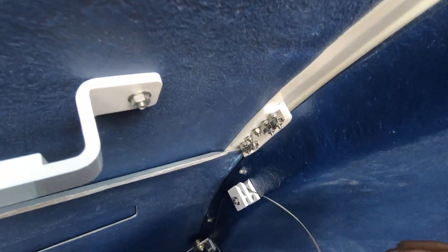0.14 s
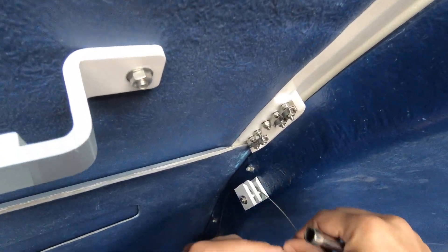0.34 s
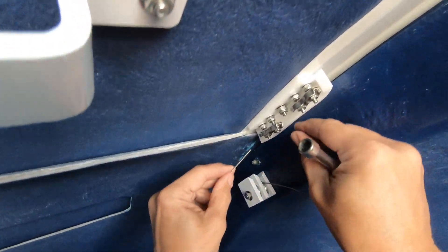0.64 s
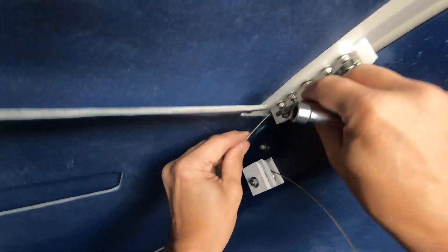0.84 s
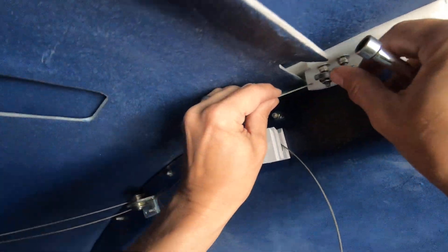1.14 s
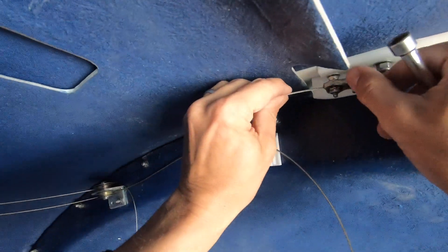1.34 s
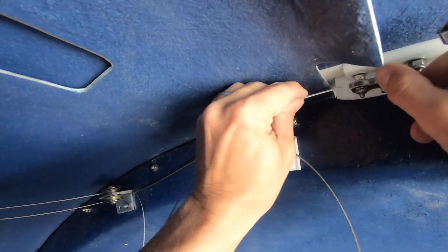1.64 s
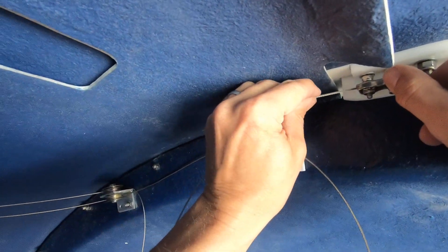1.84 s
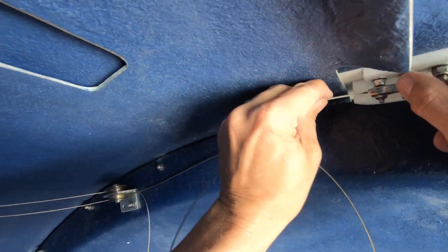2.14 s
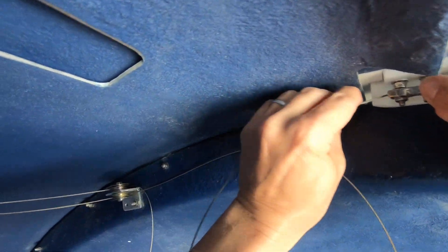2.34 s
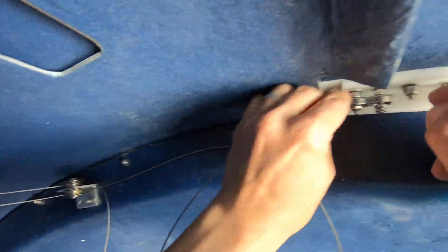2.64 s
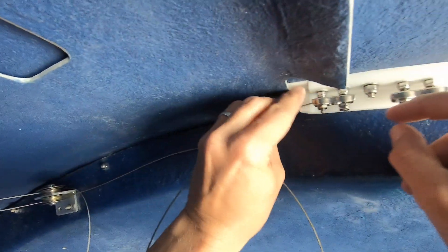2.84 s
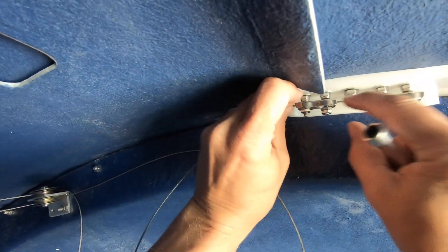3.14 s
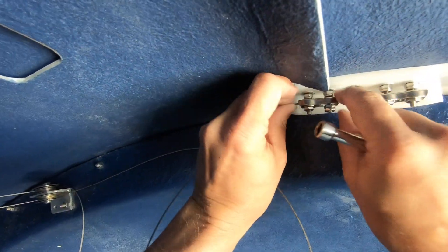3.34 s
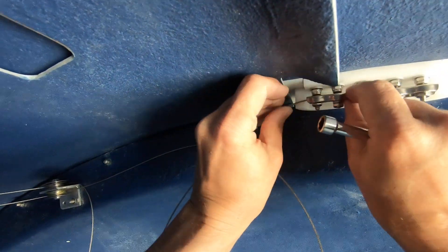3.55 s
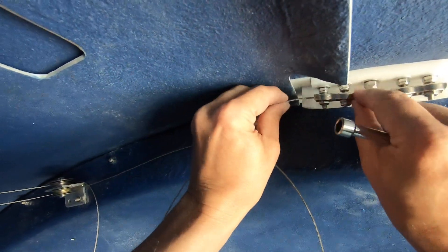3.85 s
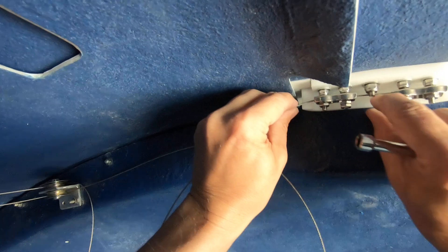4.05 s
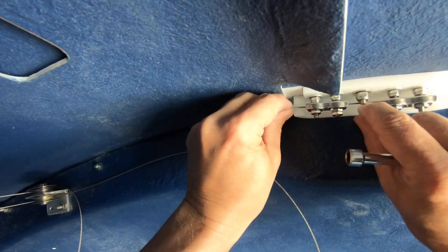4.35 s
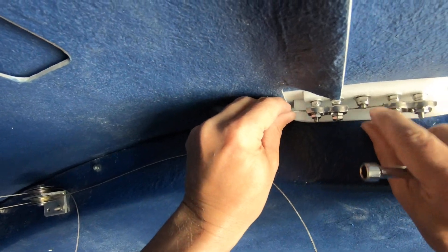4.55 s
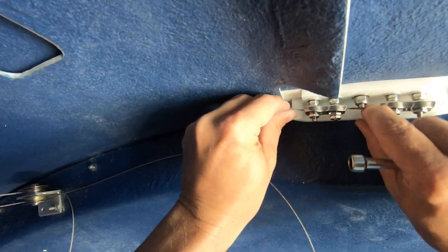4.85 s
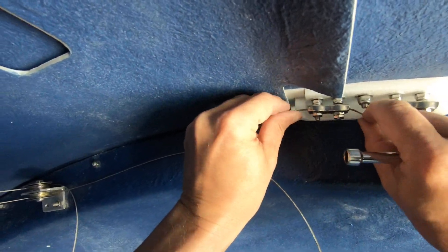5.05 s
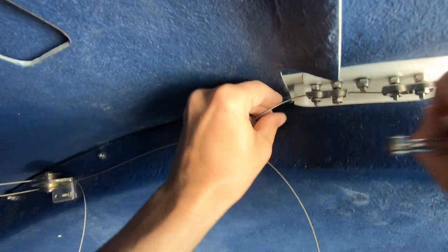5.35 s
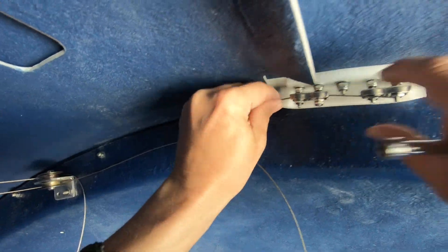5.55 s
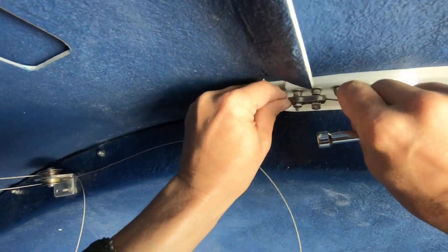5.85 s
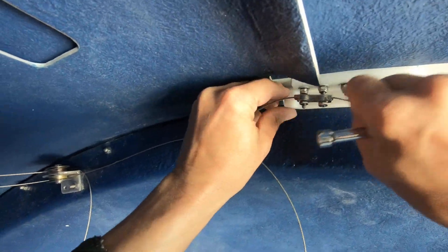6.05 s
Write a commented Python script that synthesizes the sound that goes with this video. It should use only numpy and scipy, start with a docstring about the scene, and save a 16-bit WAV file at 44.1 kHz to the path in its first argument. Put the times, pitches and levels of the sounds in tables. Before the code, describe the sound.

Steel cable clicks, ticks and scrapes irregularly through small metal fittings inside a hollow shell, with dull knocks and low thumps of its wall.

```python
"""Inside a hollow composite shell, two microphone ports hear hands thread a steel cable close by.
The cable ticks, scrapes and squeaks on small pulleys and a clamp: noise bursts, grains and glides through resonances.
A loose steel part tinkles as ringing modes. These metal sounds reverberate in the shell.
Knocks ring the modes of the wall and low thumps swing it, over low rumble, rubbing and still air."""
import sys
import numpy as np
from scipy import signal
from scipy.fft import rfft, irfft, next_fast_len
from scipy.io import wavfile
from scipy.ndimage import uniform_filter1d

SR = 44100
rng = np.random.default_rng(int(sys.argv[2]) if len(sys.argv) > 2 else 0)


def wav_out(sig):
    """Save sig, one row per channel (or a flat mono array), as 16-bit PCM at SR to the path in sys.argv[1]."""
    wavfile.write(sys.argv[1], SR, np.round(np.clip(np.atleast_2d(sig).T, -1, 1) * 32767).astype(np.int16))


N = 273230
TIME = np.arange(N) / SR


def undb(db):
    """Decibels to amplitude gain."""
    return 10 ** (np.asarray(db) / 20)


def unit(x, seconds):
    """Scale a sound to the energy of unit rms held for so many seconds."""
    energy = np.sum(x ** 2, axis=-1, keepdims=True)
    return x * np.sqrt(seconds * SR / (energy + 1e-18))


def curve(rows):
    """The columns of a table, joined by straight lines in time."""
    s, *columns = np.transpose(rows)
    return [np.interp(TIME, s, column) for column in columns]


def at(points, hz):
    """Read a (Hz, value) table on a log-frequency axis."""
    point_hz, value = np.transpose(points)
    return np.interp(np.log(hz + 1e-3), np.log(point_hz), value)


def colour(x, points):
    """Causal minimum-phase filter with a (Hz, dB) response."""
    size = next_fast_len(x.shape[-1] + 4096, real=True)
    size += size % 2
    gain = undb(at(points, np.fft.rfftfreq(size, 1 / SR)))
    cepstrum = irfft(np.log(gain))
    # folding the cepstrum onto positive time makes the filter causal
    cepstrum[1:size // 2] *= 2
    cepstrum[size // 2 + 1:] = 0
    response = np.exp(rfft(cepstrum))
    return irfft(rfft(x, size) * response)[..., :x.shape[-1]]


def resonate(x, hz, width_hz):
    """A steep resonance: a two-pole band-pass applied twice."""
    b, a = signal.iirpeak(hz, hz / width_hz, fs=SR)
    return signal.lfilter(b, a, signal.lfilter(b, a, x))


def add(out, s, sound):
    """Mix a sound in at time s."""
    i = max(int(s * SR), 0)
    out[..., i:i + sound.shape[-1]] += sound[..., :max(N - i, 0)]


def pan(db):
    """Left and right gains; db is left minus right."""
    return undb(np.array([[db], [-db]]) / 2)


def pair(size, likeness):
    """Left and right noise with a shared part."""
    likeness = np.clip(likeness, 0, 1)
    shared = rng.standard_normal(size)
    separate = rng.standard_normal((2, size))
    return np.sqrt(likeness) * shared + np.sqrt(1 - likeness) * separate


def walk(hz):
    """Smooth random wander of unit spread at about this rate."""
    size = max(int(SR / hz), 1)
    smooth = uniform_filter1d(uniform_filter1d(rng.standard_normal(N), size), size)
    return unit(smooth, N / SR)


def strokes(rows, attack_s, release_s):
    """Gain of hand movements: each swells from its start and dies away once its length is over."""
    out = np.zeros(N)
    for s, length, db in rows:
        swell = np.clip((TIME - s) / attack_s, 0, 1)
        release = np.exp(-np.maximum(TIME - s - length, 0) / release_s)
        out += undb(db) * swell * release
    return out


def ring(modes, t, scatter_db, detune):
    """Decaying sine modes; each blow weights and tunes them anew."""
    hz, db, t60 = np.transpose(modes)[:, :, None]
    size, shift, phase = rng.standard_normal((3, len(modes), 1))
    decay = undb(db + scatter_db * size - 60 * t / t60)
    tones = np.sin(2 * np.pi * (hz * (1 + detune * shift) * t + phase))
    return np.sum(decay * tones, axis=0)


def scatter(x, near_db, near_s):
    """Close surfaces add a spray of early echoes, drawn anew at every call."""
    t = TIME[:3000]
    spray = pair(len(t), 0.28) * np.exp(-t / near_s) * (t > .0015)
    echoes = unit(spray, 1 / SR)
    return x + undb(near_db) * signal.fftconvolve(x[None], echoes, axes=1)[:, :len(x)]


# how long diffuse sound lasts in the hollow: pitch_hz, t60_s
HOLLOW_T60 = [(150, 0.87), (500, 0.6), (2000, 0.56), (6000, 0.45), (9000, 0.23), (14000, 0.49)]


def tail(likeness):
    """One second of diffuse reverberation: noise that decays at its own pace in each band."""
    hz, s, frames = signal.stft(pair(SR, likeness), SR, nperseg=256)
    fading = frames * undb(-60 * s / at(HOLLOW_T60, hz)[:, None])
    return unit(signal.istft(fading, SR)[1][:, :SR], 1 / SR)


# weight of the hands on the wall: time_s, lean_db
LEAN = [(0.0, -67), (0.47, -65.5), (1.31, -43.5), (1.42, -41), (1.62, -48.5), (3.02, -46.5), (3.28, -50.5),
        (3.97, -44), (4.28, -50.5), (4.97, -54), (5.31, -47.5), (5.78, -56.5), (6.2, -45)]
# a hand shifts its grip and rubs the wall: start_s, length_s, level_db
RUBS = [(1.23, 0.023, -28), (2.5, 0.27, -40), (2.98, 0.081, -37.5), (3.3, 0.14, -34.5), (3.93, 0.05, -26),
        (4.62, 0.093, -43), (4.97, .17, -42.5), (5.38, 0.039, -75), (6.04, .08, -36)]
# spectra of rumble, rubbing and still air: pitch_hz, density_db (dB per Hz)
RUMBLE = [(15, 9), (30, -12.5), (48, 6.5), (65, -0.5), (100, -1), (160, -9.5), (400, -88), (3000, -110)]
RUB = [(70, -28.5), (150, 4.5), (290, -0.5), (420, -6.5), (700, -18.5), (1300, -35), (3000, -39.5),
       (8000, -57), (16000, -93)]
AIR = [(15, -17), (25, -12), (55, 2.5), (99, -10.5), (157, -0.5), (335, -6.5), (545, -17), (714, -14),
       (1330, -16.5), (2550, -27.5), (6210, -35.5), (12200, -51.5), (16000, -73)]


def background(rumble_above_lean_db=6, tremble_db=6, tremble_hz=9, air_db=-52.5):
    """Hands rumble and rub on the wall as coloured noise, over the still air of the room."""
    lean_db = curve(LEAN)[0] + tremble_db * walk(tremble_hz)  # the hands never press quite evenly
    rumble = undb(lean_db + rumble_above_lean_db) * unit(colour(pair(N, 0.23), RUMBLE), N / SR)
    resting = undb(-20.5 + 0.56 * lean_db)  # resting hands rub faintly, more as they lean harder
    rubbing = np.hypot(strokes(RUBS, attack_s=0.058, release_s=0.099), resting)
    rub = rubbing * unit(colour(pair(N, 0.78), RUB), N / SR)
    air = undb(air_db) * unit(colour(pair(N, 0.068), AIR), N / SR)
    return rumble * pan(-5.5) + rub * pan(-5.0) + air * pan(-1.1)


# low thumps of the wall, slow pushes and a few short, well-damped knocks: start_s, peak_db, pitch_hz
THUMPS = [(1.264, -29, 83.5), (1.307, -25, 71), (1.341, -26, 95), (1.403, -25, 67), (1.505, -30.5, 65.4),
          (2.036, -36, 110), (2.24, -30, 83), (2.261, -29, 213), (2.62, -34, 62.5), (3.085, -30, 107),
          (3.437, -21, 113.6), (3.445, -12.5, 66.8), (3.476, -25, 127.6), (3.585, -32.5, 67),
          (3.784, -25, 69.6), (3.975, -30.5, 74), (5.1, -37.5, 74), (5.182, -19.5, 268), (5.212, -21, 284),
          (5.3, -37, 70.3), (5.897, -31, 82), (6.073, -22.5, 120), (6.105, -22, 89)]


def thumps(rise_cycles=1.05, overtone_db=-11):
    """The wall swells and settles in a few damped swings; a stiffer spot swings faster and settles sooner."""
    out, t = np.zeros(N), TIME[:SR // 2]
    for s, db, hz in THUMPS:
        overtone = np.sin(2 * np.pi * (1.55 * hz * t + rng.random()))
        swing = np.sin(2 * np.pi * hz * t) + undb(overtone_db) * overtone
        age = t * hz / rise_cycles
        add(out, s, undb(db) * swing * age * np.exp(1 - age))
    return out * pan(-7.0)


# knocks on the wall: start_s, level_db, contact_cutoff_hz, contact_length_s, favoured_pitch_hz
KNOCKS = [(0.886, -26.5, 644, 0.0055, 196), (.897, -31.5, 800, 0.018, 590), (1.218, -32, 1010, 0.021, 513),
          (1.241, -32.5, 1010, 0.005, 323), (2.256, -38, 684, 0.0025, 280), (2.529, -37, 454, 0.02, 260),
          (2.841, -39, 610, 0.0065, 272), (3.158, -38, 750, 0.0033, 200), (3.269, -33, 850, 0.013, 280),
          (3.324, -37.5, 700, 0.31, 426), (3.754, -31.5, 805, 0.0036, 186),
          (3.891, -32.5, 720, 0.0062, 283), (3.965, -28.5, 925, .03, 380), (4.626, -37.5, 775, 0.011, 246),
          (4.726, -39.5, 502, 0.0065, 201), (5.084, -36, 587, 0.0097, 252), (5.183, -34, 476, 0.0018, 297),
          (5.209, -32, 480, 0.0024, 292), (5.347, -37, 494, 0.0025, 312), (5.763, -40, 614, 0.048, 270),
          (5.976, -37, 603, 0.022, 274), (6.055, -31, 970, .006, 290), (6.108, -33.5, 800, 0.008, 205)]
# modes of the shell: pitch_hz, level_db, t60_s
SHELL = [(126.2, 2, 1), (156.9, 5, 0.72), (199.8, -0.5, 0.71), (232.6, -1, 1), (235.8, -8, 0.89),
         (269, -22.5, 0.14), (292, -1.5, 1), (332.6, -1.5, 0.21), (356.4, -0.5, 0.18), (382, -1, 0.93),
         (435.5, 2, .5), (493, -8.5, 1), (505.6, 6.5, 0.46), (544, -4.5, 0.51), (648, -9.5, 0.25),
         (756, 0.5, 0.73), (813, -3.5, 0.25), (1180, -37, 0.28), (1116, -6.5, 0.21)]
# dense overtones between the modes: pitch_hz, density_db (dB per Hz)
SHELL_DENSE = [(60, 2.5), (150, 3), (300, -9), (600, 2), (1000, -2), (2000, -0.5), (4000, -10.5),
               (7000, -12.5), (10000, -20), (16000, -49)]


def knocks(dense_db=-3, span_s=0.089, hand_damping_s=0.22, strike=0.17):
    """A knuckle or fitting bumps the wall and drags; softer contact is duller, and the resting hand damps it."""
    out, t = np.zeros((2, N)), TIME[:SR]
    for s, db, cut_hz, contact_s, spot_hz in KNOCKS:
        modes = unit(ring(SHELL, t, scatter_db=3.5, detune=0.008), 0.31)
        dense = unit(colour(tail(likeness=0.24), SHELL_DENSE), 1)
        # part of the push arrives at once, the rest while it drags
        push = 1 - (1 - strike) * np.exp(-2 * t / max(contact_s, 1e-3))
        blow = (modes + undb(dense_db) * dense) * push * np.exp(-t / hand_damping_s)
        spot = unit(resonate(blow, spot_hz, spot_hz / 2), 0.39)
        blow = unit(blow, 0.86) + spot
        b, a = signal.butter(2, cut_hz, fs=SR)
        add(out, s, undb(db) * unit(signal.lfilter(b, a, blow), span_s))
    return out * pan(-5.0)


# strikes of a loose steel part: start_s, level_db
TINKLES = [(1.244, -46), (1.271, -42), (2.629, -50), (2.701, -46.5), (2.736, -49.5), (2.783, -49),
           (3.113, -58), (3.165, -55), (5.214, -67), (5.247, -45.5), (5.358, -43), (5.979, -53.5),
           (6.133, -47.5), (6.161, -44.5)]
# modes of the steel part: pitch_hz, level_db, t60_s
STEEL = [(6228, -4, .14), (7156, -6, .14), (9653, -5, .14), (9738, -7, .07), (11620, -8, .06),
         (11800, -8, .06), (12130, -7, .07), (12330, -10, .06), (14300, -18, .06)]


def tinkles(chatter_s=.006, clash_s=.012, clash_db=-4, span_s=.02):
    """The loose steel part chatters in its seat: a bright noisy clash and a brief high ring of its modes."""
    out, t = np.zeros((2, N)), TIME[:SR // 3]
    for s, db in TINKLES:
        chatter = pair(len(t), 0.53) * np.exp(-t / chatter_s)
        modes = ring(STEEL, t, scatter_db=2.5, detune=.001)
        tone = unit(signal.fftconvolve(chatter, modes[None], axes=1)[:, :len(t)], span_s)
        clash_force = pair(len(t), .3) * np.exp(-t / clash_s)
        clash = unit(resonate(clash_force, hz=11700, width_hz=2000), span_s)
        add(out, s, undb(db) * (tone + undb(clash_db) * clash))
    return out


# squeaks and rasps of the taut cable:
# start_s, length_s, level_db, start_pitch_hz, end_pitch_hz, pitch_roughness (share of the pitch)
SQUEAKS = [(4.251, 0.062, -68, 2950, 3860, .02), (4.315, 0.045, -59, 3900, 4740, .018),
           (4.346, 0.056, -58, 5350, 6900, 0.021), (4.953, 0.043, -48, 4900, 4040, 0.3),
           (5.005, 0.044, -44, 4930, 3800, 0.21)]


def squeaks(waver_hz=2500, grip_hz=250, grip_db=6.1):
    """Stick-slip glides in pitch: a thin whistle when even, a rasp when not."""
    out, wobble, grip = np.zeros(N), walk(waver_hz), walk(grip_hz)
    for s, length, db, start_hz, end_hz, rough in SQUEAKS:
        u = np.linspace(0, 1, int(length * SR))
        span = slice(int(s * SR), int(s * SR) + len(u))
        hz = start_hz * (end_hz / start_hz) ** u * (1 + rough * wobble[span])
        level = undb(db + grip_db * grip[span]) * np.sin(np.pi * u)
        add(out, s, level * np.sin(2 * np.pi * np.cumsum(hz) / SR))
    return out


# dull clacks of the clamp on its seat: start_s, level_db
CLACKS = [(0.8878, -42), (1.2453, -28.5), (1.278, -32), (1.3468, -36.5), (2.782, -35), (3.1654, -35),
          (3.2684, -40), (3.449, -37), (3.751, -32.5), (3.8986, -28), (3.975, -37.5), (6.0619, -25)]


def clacks(hz=1500, width_hz=1900, decay_s=0.0037, span_s=0.0036):
    """The clamp rocks on its seat: a short noise rattle low in the fitting's range."""
    out, t = np.zeros((2, N)), TIME[:SR // 10]
    for s, db in CLACKS:
        force = rng.standard_normal(len(t)) * np.exp(-t / decay_s)
        clack = undb(db) * unit(resonate(force, hz, width_hz), span_s)
        add(out, s, scatter(clack, near_db=-1.5, near_s=0.022))
    return out


# pulls that slide the cable through the pulleys: start_s, length_s, level_db
PULLS = [(1.788, 0.057, -53.5), (2.16, 0.086, -61), (2.27, 0.083, -58), (2.438, 0.16, -46),
         (2.627, .17, -41.5), (2.919, 0.14, -43.5), (3.042, 0.13, -46.5), (3.294, .05, -59.5),
         (3.47, 0.027, -44), (3.578, 0.035, -54.5), (3.759, 0.11, -61.5), (3.93, 0.048, -39.5),
         (4.08, 0.073, -43.5), (4.44, 0.06, -45), (4.614, 0.013, -40.5), (4.78, 0.066, -57),
         (4.872, 0.032, -48.5), (4.971, 0.069, -52.5), (5.092, 0.021, -44), (5.21, 0.046, -42.5),
         (5.353, 0.037, -49), (5.469, 0.069, -53), (5.77, 0.11, -52), (5.967, 0.064, -43),
         (6.071, .14, -42)]


def slide(grain_rate=3300, spread_db=6.0, catch_db=3.0, catch_hz=160, shift_db=0.5, shift_hz=35):
    """Twisted strands catch and slip on the pulley rims: dense micro-clicks in uneven spurts of shifting colour."""
    struck = rng.random(N) < grain_rate / SR  # grain_rate is per second
    sign = rng.choice([-1, 1], N)
    size_db = spread_db * np.minimum(rng.exponential(size=N), 4) + catch_db * walk(catch_hz)
    grains = struck * sign * undb(size_db)
    # resonances of the rims: pitch_hz, width_hz, level_db
    rims = [(11700, 1600, -11.0), (5780, 2930, -1), (3750, 2360, -3.5), (2207, 2130, -1.0), (1147, 1540, -3.0)]
    scrape = 0
    for hz, width_hz, db in rims:
        shifting = grains * undb(shift_db * walk(shift_hz))  # each band flickers on its own
        scrape = scrape + undb(db) * unit(resonate(shifting, hz, width_hz), N / SR)
    speed = strokes(PULLS, attack_s=0.013, release_s=.018)
    # the factor 1.46 in energy lifts the scrape above the level of its pull
    return scatter(speed * unit(scrape, 1.46 * N / SR), near_db=-4.0, near_s=0.0049) * pan(-0.43)


def stray_ticks(rate_per_s=14, above_pull_db=2, spread_db=5.5, body_db=-3, decay_s=0.0017):
    """Strands catch at random moments of each pull, at most eight times: the harder the pull, the louder."""
    ticks = []
    for (s, length, db), chance in zip(PULLS, rng.random((len(PULLS), 8, 2))):
        waits = np.cumsum(-np.log(1 - chance[:, 0])) / rate_per_s
        for wait, u in zip(waits, chance[:, 1]):
            if wait < length:
                level_db = db + above_pull_db + spread_db * (2 * u - 1)
                ticks.append((s + wait, level_db, body_db, decay_s))
    return ticks


# the cable snaps against the fittings:
# start_s, level_db, body_db (body of the fitting relative to level_db), contact_decay_s
CLICKS = [(.0466, -59, -2, 0.003), (.294, -49.5, 0, 0.018), (.468, -57.5, 0.5, 0.017),
          (.8865, -48.5, -4, 0.024), (1.186, -48, -20, 0.0014), (1.2224, -28, -2.5, .004),
          (1.2452, -23.5, -6.5, 0.0027), (1.2704, -25.5, -0.5, 0.017), (1.278, -23.5, -14, 0.0049),
          (1.5127, -38.5, 0, 0.0018), (1.5967, -53.5, 2.5, .0012), (1.8224, -51, -3, .0024),
          (1.8377, -35.5, -8, .0018), (1.9284, -39, -8.5, .0012), (1.973, -44, -5, 0.0051),
          (2.1547, -45.5, -3, 0.0065), (2.2559, -36.5, 3, 0.024), (2.2635, -22, -16.5, 0.0018),
          (2.3342, -35.5, -4.5, .0011), (2.4581, -37, -1, .003), (2.547, -37, -23, 0.002),
          (2.6306, -23.5, -10, 0.00077), (2.6385, -22, -8.5, 0.0036), (2.6674, -30.5, -9, .006),
          (2.7028, -31, -21, 0.0038), (2.7342, -26, -25, .0014), (2.7845, -27.5, -7, 0.0018),
          (2.8446, -19.5, -12, .0014), (3.005, -36.5, 0, 0.002), (3.051, -29, -14, 0.0082),
          (3.1124, -21.5, -20, 0.0023), (3.1658, -24.5, -16, 0.00071), (3.494, -32, -3, .0015),
          (3.595, -42, -6, 0.0033), (3.6777, -49, -8, .0022), (3.8951, -26, -8, 0.0009),
          (3.8988, -26.5, -10, 0.0038), (3.9401, -33, -11, .0026), (4.0409, -27.5, -11, 0.002),
          (4.0518, -15.5, -14.5, 0.0027), (4.1131, -28, -15, 0.003), (4.4338, -26.5, -4, 0.013),
          (4.4785, -29, -5.5, 0.006), (4.4921, -31, -23, 0.0015), (4.5412, -30, -3, .0006),
          (4.7261, -24, -11.5, 0.0025), (4.7899, -37, -2.5, 0.0092), (4.8392, -44.5, -6, 0.00093),
          (4.9155, -41, -4, 0.0014), (5.079, -20.5, -4, 0.0054), (5.1243, -46.5, 11.5, 0.0016),
          (5.1835, -28.5, 1.5, 0.0019), (5.2145, -22, -7.5, 0.0026), (5.2474, -20, -14, 0.0019),
          (5.3155, -24, -4.5, 0.00048), (5.3541, -17.5, -13, 0.0088), (5.3934, -27, -17, 0.0017),
          (5.7669, -21, -7.5, 0.011), (5.8225, -36, -18, 0.0054), (5.8542, -33.5, -12, 0.0041),
          (5.8985, -36.5, -5, 0.0065), (5.98, -30.5, -14, 0.0029), (5.9952, -27, -17, 0.0059),
          (6.0627, -23.5, 0.5, .0016), (6.0915, -36.5, 4, 0.0039), (6.115, -29.5, -1, .001),
          (6.155, -29.5, -13, 0.0098), (6.1862, -30, -9, .004)]


def clicks(grit=0.72, span_s=0.0064, rise_s=0.00022, lead_in_db=-23, lead_in_s=0.0053, hold_s=.0006, wander_db=2.2):
    """A burst of strand contacts rings the broad resonances of the fitting."""
    out, t = np.zeros((2, N)), np.arange(-.015, .08, 1 / SR)
    before = np.minimum(t, 0)
    after = np.maximum(t - hold_s, 0)  # the strands stay in touch for a moment
    # a faint noise rises just before each click
    lead_in = np.exp(before / rise_s) + undb(lead_in_db) * np.exp(before / lead_in_s)
    for s, level_db, body_db, decay_s in CLICKS + stray_ticks():
        push, size = rng.standard_normal((2, len(t)))
        force = push * lead_in * np.exp(grit * size - after / max(decay_s, 2e-4))
        # pitch_hz, width_hz, level_db; a harder contact stirs less of the body and rings higher
        bands = [(6030 - 80 * body_db, 3700, 0),  # bright ring
                 (2450, 1900, body_db),  # body
                 (1250, 1400, -9.5 + 0.25 * body_db),  # dull part, follows the body a little
                 (11500, 5600, -12)]  # thin treble edge
        tick = sum(undb(level_db + db) * unit(resonate(force, hz, width_hz), span_s)
                   for hz, width_hz, db in bands)
        side = pan(wander_db * rng.standard_normal())
        add(out, s + t[0], side * scatter(tick, near_db=-7.5, near_s=0.015))
    return out


# strength at the two microphone ports: pitch_hz, left_minus_right_db
PORT_BALANCE = [(300, -54), (650, -16), (1000, -1.5), (1700, 0), (2500, -2), (5000, -2.5), (6000, -4.5),
                (7000, 3.5), (8000, 8), (9000, -10), (11000, 1)]
# timing at the two microphone ports: pitch_hz, left_lead_rad
PORT_PHASE = [(100, 6), (550, -0.5), (800, 2.5), (1600, 1.19), (2400, 0.93), (5000, 0.5), (6500, -1),
              (7700, -2), (9000, -2), (15000, -2.5)]


def shell(x, far_db=-12.5):
    """The hollow reverberates; the two ports hear each band out of step and at unequal strength."""
    walls = undb(far_db) * tail(likeness=0.16)
    walls = np.pad(walls, ((0, 0), (SR // 200, 0)))  # the first far echo needs 5 ms
    centre = x.mean(axis=0, keepdims=True)
    heard = x + signal.fftconvolve(centre, walls, axes=1)[:, :N]
    hz = np.fft.rfftfreq(2 * N, 1 / SR)
    lean = np.log(undb(at(PORT_BALANCE, hz))) + 1j * at(PORT_PHASE, hz)
    ports = np.exp(np.array([lean, -lean]) / 2)  # half of the difference to each side
    return irfft(rfft(heard, 2 * N) * ports)[:, :N]


# how the fittings radiate: pitch_hz, gain_db
FITTING = [(150, -15), (600, 3.5), (2000, 3), (5000, 1), (7600, -2), (8700, -12), (10500, -8.5),
           (13000, -17.5), (16000, -30)]


def scene():
    """Metal sounds in the hollow, the wall's own sounds and the background."""
    wall = knocks() + thumps() + background()
    cable = slide() + squeaks() + clacks() + clicks()
    metal = colour(cable, FITTING) + tinkles()
    return shell(metal) + wall


def record(dry, ceiling=.65, top_hz=16200):
    """The recorder rounds the tallest peaks and cuts the top."""
    rounded = ceiling * np.tanh(dry / ceiling)
    low_pass = signal.ellip(8, .2, 70, top_hz, fs=SR, output="sos")
    return signal.sosfilt(low_pass, rounded)


dry = scene()
out = record(dry)
wav_out(out)
```